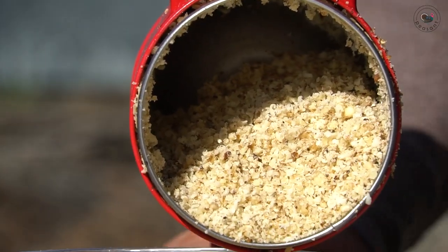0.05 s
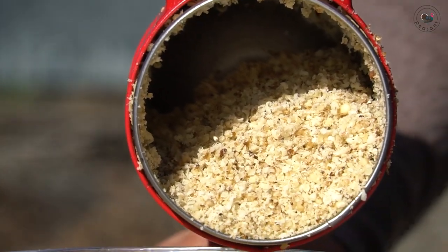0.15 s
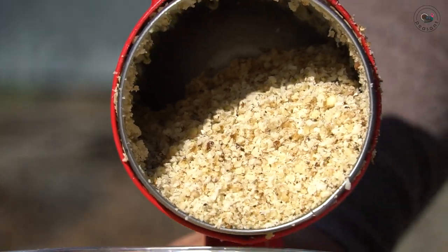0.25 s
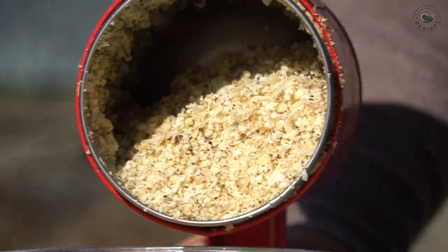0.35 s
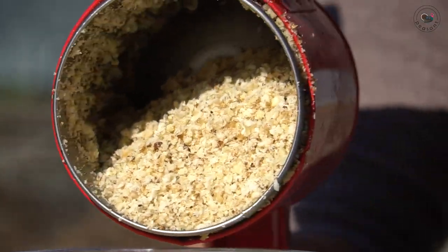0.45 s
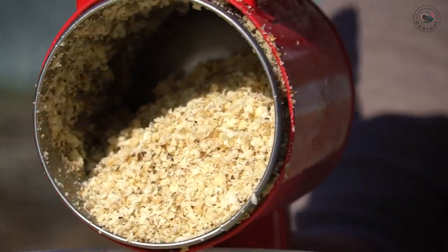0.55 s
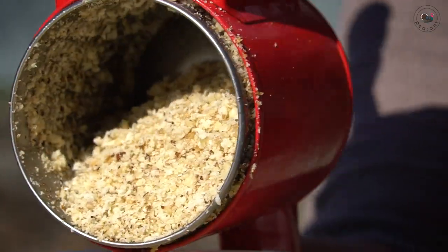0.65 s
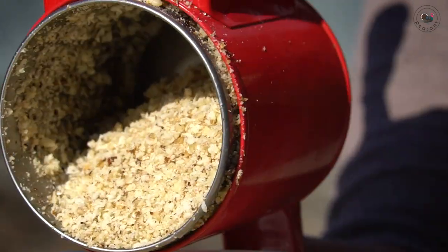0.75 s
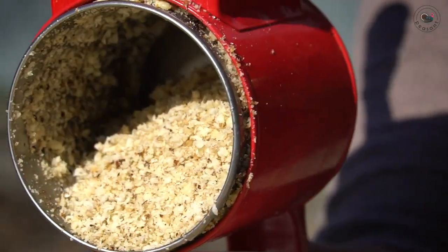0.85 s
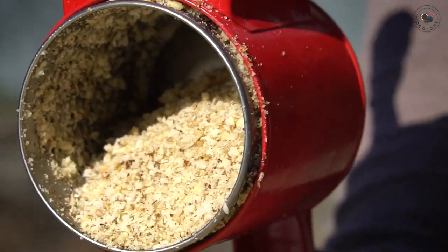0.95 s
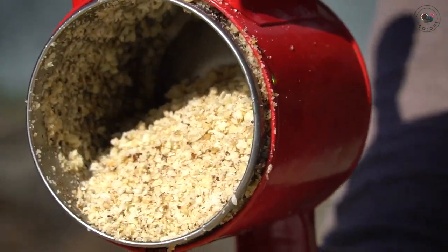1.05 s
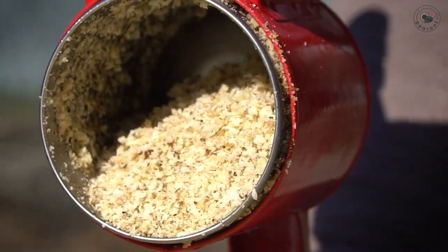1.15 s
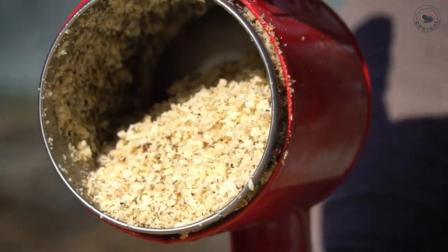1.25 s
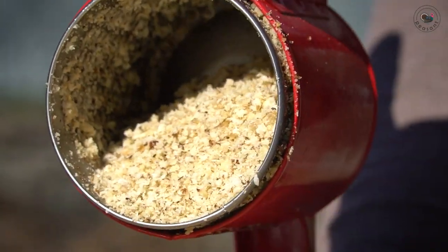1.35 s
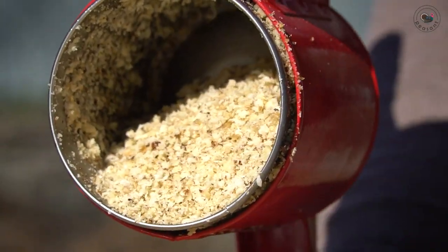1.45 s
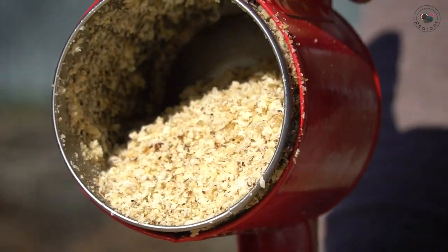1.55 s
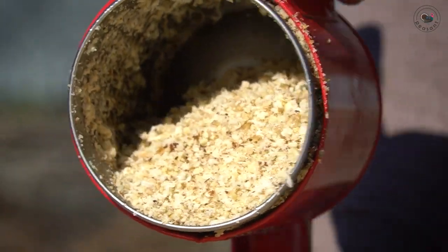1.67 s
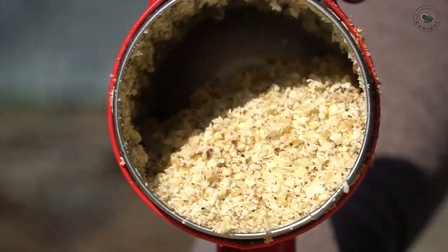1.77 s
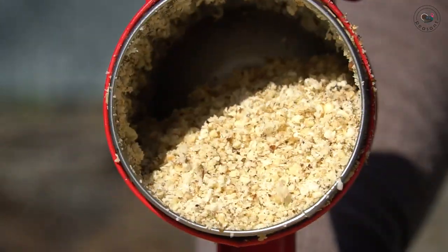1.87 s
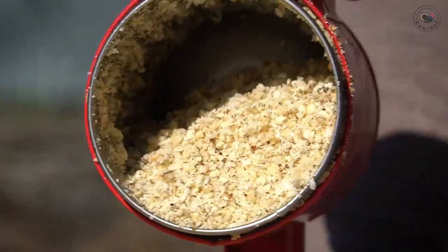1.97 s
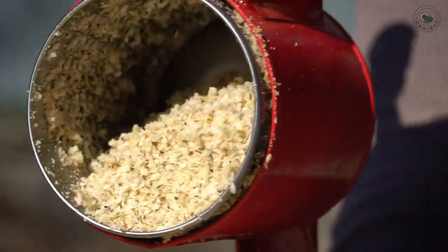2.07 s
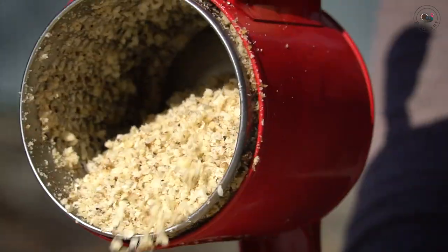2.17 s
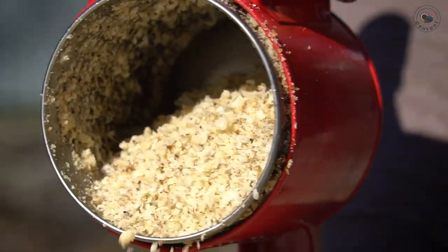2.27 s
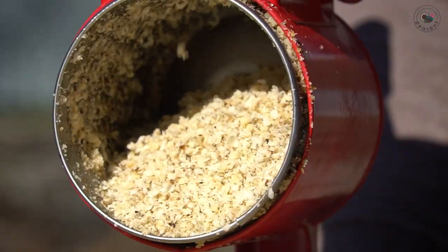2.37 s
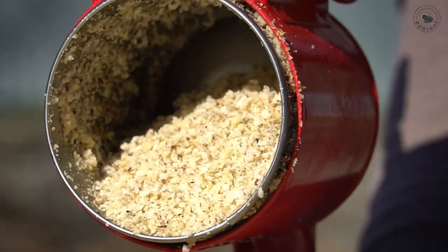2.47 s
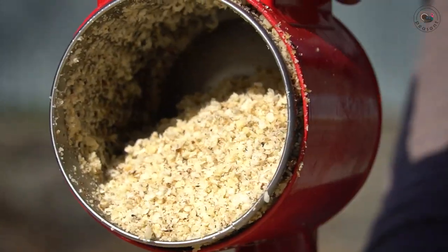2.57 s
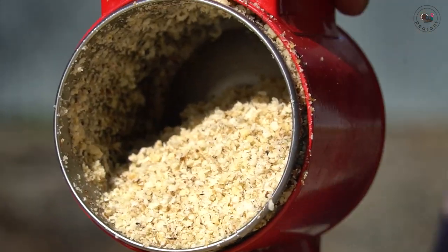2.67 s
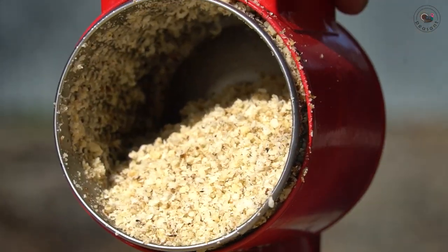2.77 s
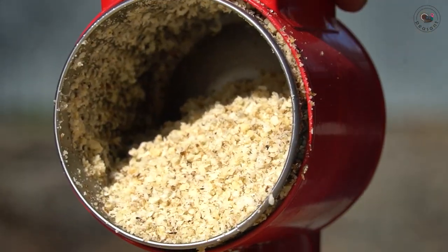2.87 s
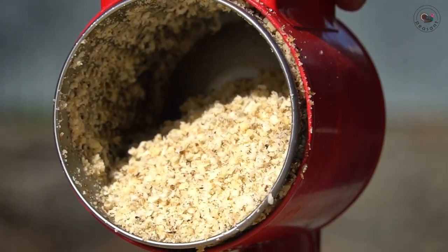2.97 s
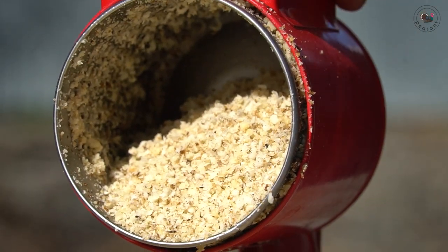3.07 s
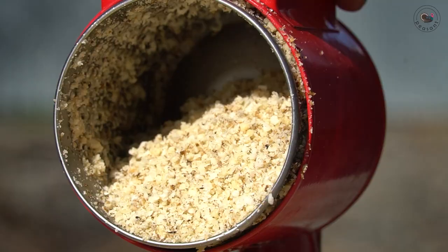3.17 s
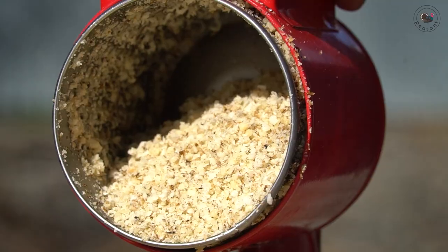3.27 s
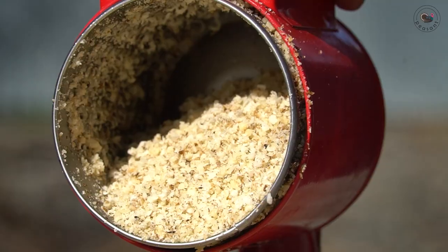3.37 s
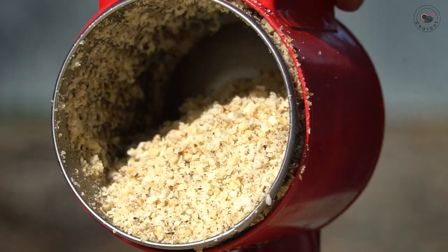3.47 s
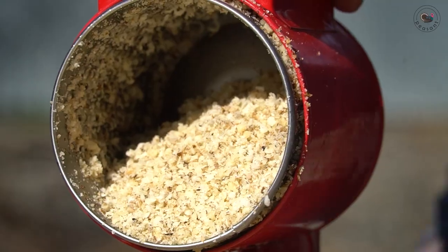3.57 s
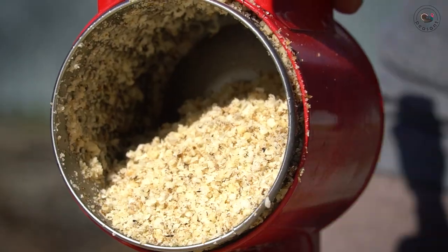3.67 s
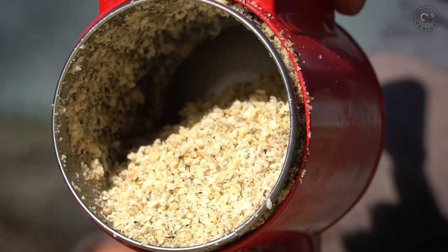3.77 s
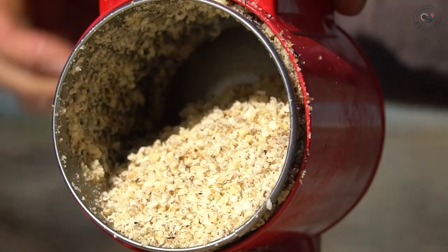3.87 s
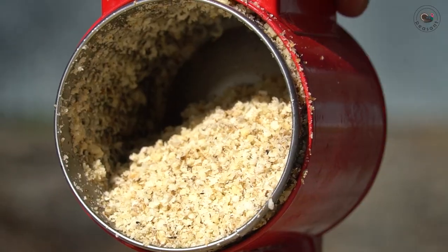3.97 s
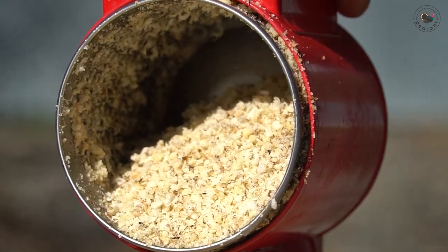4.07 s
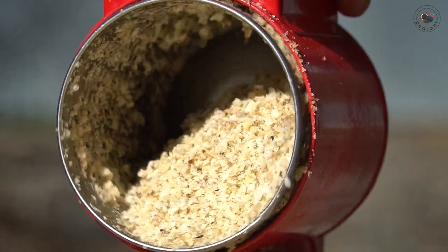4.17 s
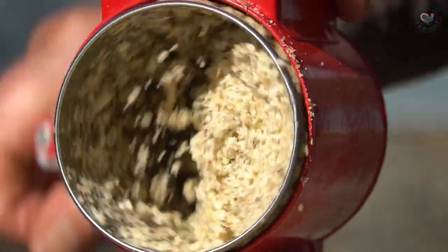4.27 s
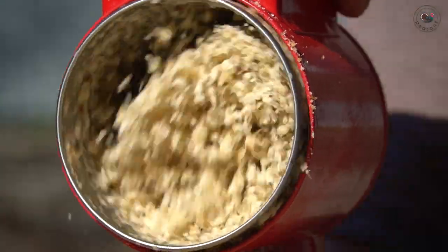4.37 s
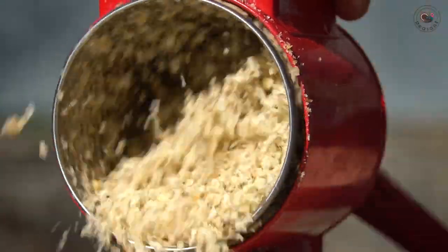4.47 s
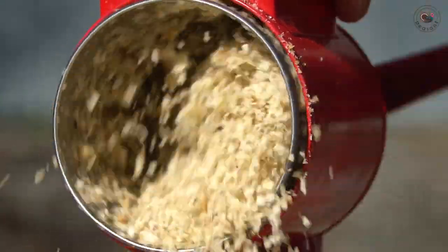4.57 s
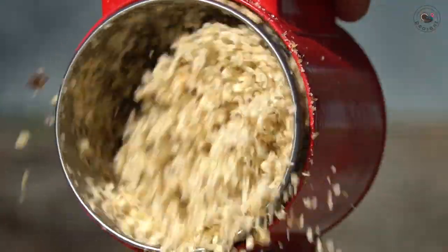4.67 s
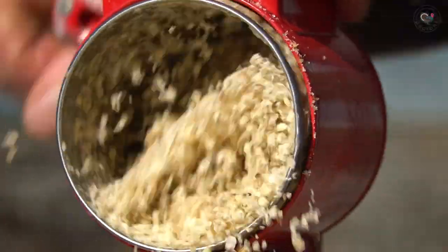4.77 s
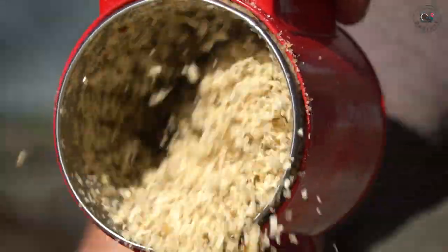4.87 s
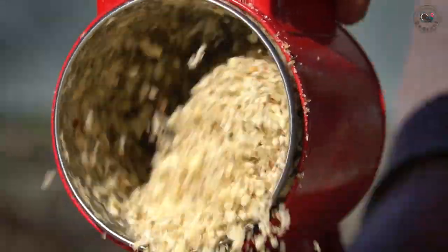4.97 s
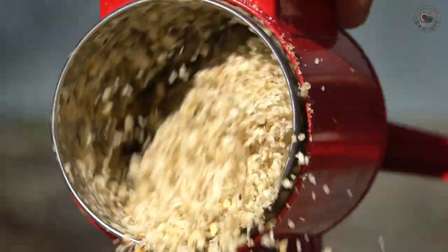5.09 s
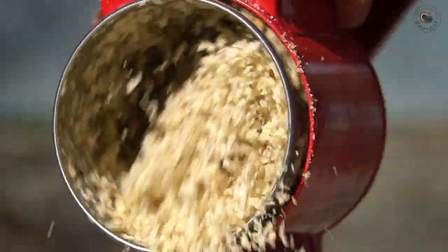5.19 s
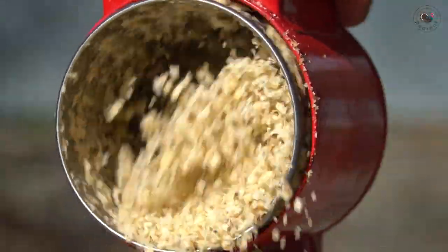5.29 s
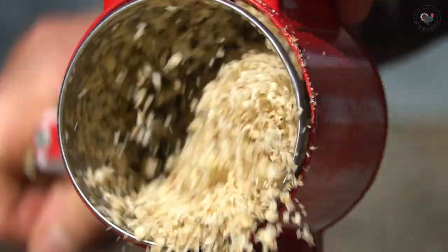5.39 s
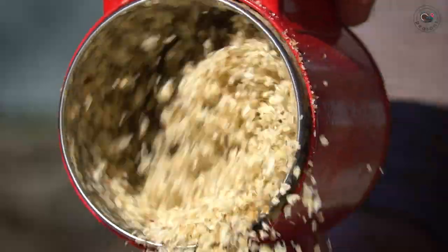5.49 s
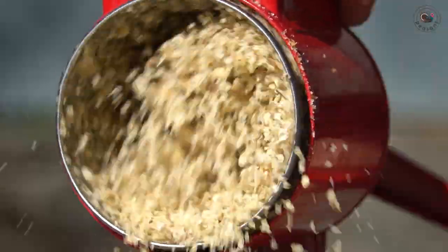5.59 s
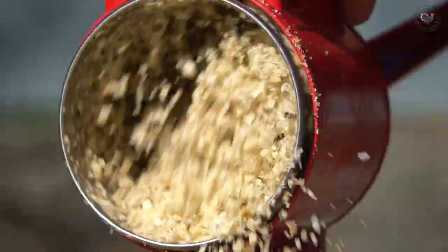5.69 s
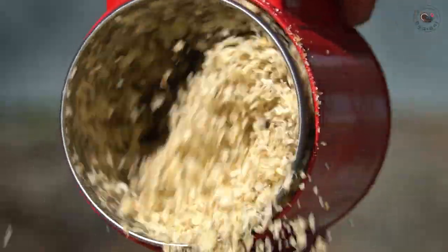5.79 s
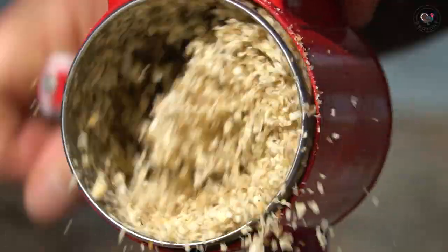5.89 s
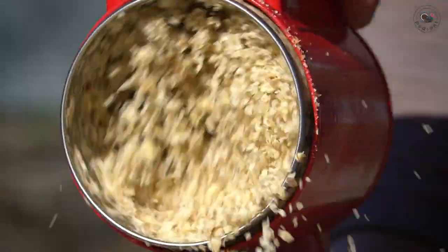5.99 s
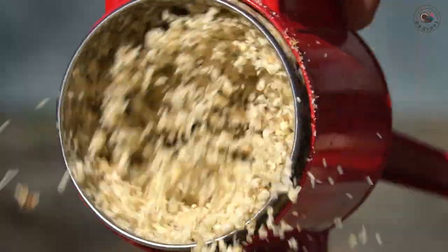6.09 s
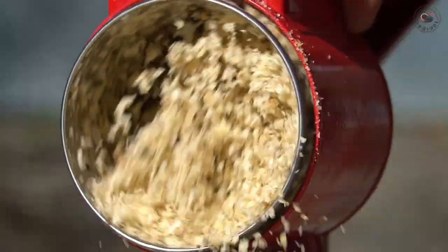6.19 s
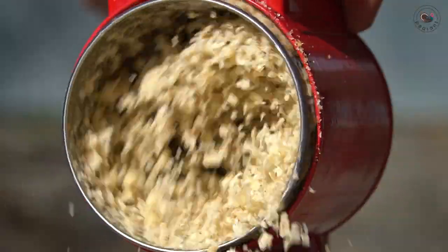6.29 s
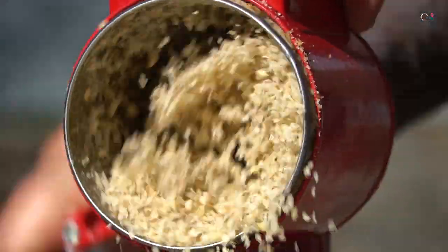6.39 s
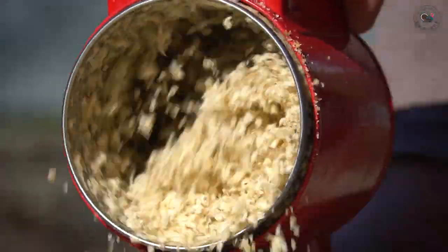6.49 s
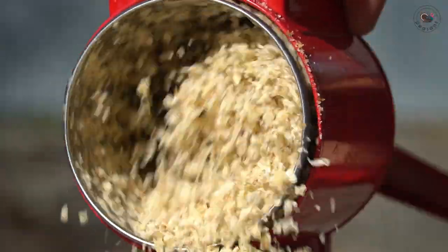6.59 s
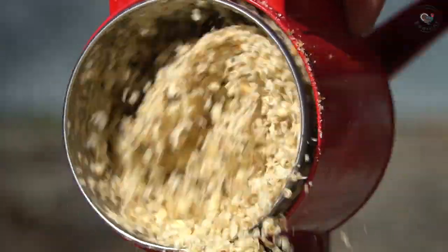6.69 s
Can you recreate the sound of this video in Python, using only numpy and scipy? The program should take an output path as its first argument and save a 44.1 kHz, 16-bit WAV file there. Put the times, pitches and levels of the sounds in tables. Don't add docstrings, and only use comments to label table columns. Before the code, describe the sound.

Sparse hollow plastic clacks and faint finger rubs over open-air hush, then a hand-cranked grater rasps and cracks nuts continuously to the end.

```python
import sys
import numpy as np
from scipy import signal
from scipy.io import wavfile
from scipy.ndimage import uniform_filter1d

SR = 44100
rng = np.random.default_rng(int(sys.argv[2]) if len(sys.argv) > 2 else 0)


def invert_db(x):
    u = np.asarray(x, float) / 20
    return 10 ** u


def master_out(mix):
    frames = np.transpose(np.atleast_2d(mix))
    ceiling = np.clip(frames, -1, 1)
    pcm = np.round(ceiling * 32767).astype(np.int16)
    wavfile.write(sys.argv[1], SR, pcm)


N = 297234
T = np.arange(N) / SR

# frequency in Hz, level in dB per Hz.
AIR_SPECTRUM = [(25, 8), (80, 8.5), (217, -7), (317, 2.5), (503, -14), (796, -5), (2280, -17), (6920, -25)]
AIR_DB = -51.5

# frequency in Hz, width in Hz, level in dB, left minus right in dB.
TABLE_MODES = [(66, 12, 0, 1.4), (133, 18, -3, 1.7), (100, 50, -11, 1.5), (200, 30, -13, 1.8)]
# centre in seconds, length in seconds, boom in dB.
HEAVES = [(0.015, 0.13, -46), (0.27, 0.052, -33), (0.57, 0.25, -44), (0.997, 0.26, -40),
          (1.328, 0.24, -40.5), (1.802, 0.24, -41), (2.082, 0.13, -37.5), (3.453, 0.12, -52),
          (3.638, 0.16, -46), (3.905, 0.16, -48), (4.102, 0.27, -51), (4.443, 0.31, -36),
          (4.652, 0.086, -40), (4.905, 0.28, -36.5), (5.44, 0.37, -34.5), (5.612, 0.079, -32),
          (5.848, 0.19, -34.5), (6.035, 0.084, -32), (6.285, 0.095, -32), (6.564, 0.17, -32.5)]
REST_DB, SHAKE_DB = -62, -13.5

# frequency in Hz, width in Hz, level in dB, left minus right in dB.
HOUSING_MODES = [(253, 65, -2, 1.5), (306.2, 34, 5.5, 2), (422, 168, 1, 3.5), (514, 86, 2, 1.5),
                 (633, 397, -4, 0), (782.5, 206, 3.5, 4), (829.3, 137, 7, 1.5), (893, 260, -7.5, 11),
                 (1140, 170, -14.5, -16)]
CRUMB_MODES = [(3500, 1570, 3.5, -1.3), (4050, 1700, 1, 0.22), (5450, 1500, -6, 0.32),
               (1740, 1300, -3.5, -0.12)]
SKIN_MODES = [(4960, 6600, 1, .1), (9000, 8800, 1.5, .1), (13500, 6800, 3, .1)]
DRUM_MODES = [(1586, 580, 5, 3.5), (2020, 410, 8.5, -4), (2940, 860, 7, -1.5), (3850, 1330, 0.5, -4.5),
              (4550, 200, -3.5, 15.5)]
TEETH_MODES = [(5570, 2120, 3.5, 1), (6900, 1060, -3, 1), (8600, 2900, 2, -1), (11440, 1550, -7, -1.3),
               (14200, 5100, -0.5, -1.6)]

# time in seconds, creak in dB.
GRIP = [(0.0, -64), (0.44, -48.5), (0.75, -71.5), (1.25, -52), (1.7, -63), (1.93, -54.5), (2.7, -74),
        (2.91, -58), (3.38, -64), (3.67, -54.5), (4.1, -59), (4.25, -48)]
# start in seconds, length in seconds, crumb rustle in dB, finger slide in dB.
RUBS = [(0.018, 0.049, -48.5, -52.5), (0.073, 0.013, -56, -56), (0.1, 0.051, -48.5, -48.5),
        (0.163, 0.051, -50, -57), (0.242, 0.042, -53, -56), (0.327, 0.051, -51, -51.5),
        (0.381, 0.02, -46, -51), (0.411, 0.046, -43, -46.5), (0.494, 0.011, -68, -49),
        (0.524, 0.038, -51, -53.5), (0.573, 0.024, -53, -60), (0.732, 0.028, -51.5, -62),
        (0.883, 0.017, -54.5, -57), (1.142, 0.023, -58, -71), (1.395, 0.025, -53, -53),
        (1.458, 0.073, -61, -55), (2.274, 0.0056, -73, -50), (2.86, 0.055, -62, -60),
        (3.085, 0.14, -65, -49.5), (3.549, 0.066, -58.5, -63), (3.629, 0.053, -60, -73)]
TRICKLE_DB, SETTLE_DB_PER_S = -58, 8.5

# frequency in Hz, decay by 60 dB in seconds, level in dB.
BODY_MODES = [(319.7, 0.09, 12), (287.3, 0.26, -2.5), (393.5, 0.043, 11), (275, .06, -31)]
SHELL_MODES = [(576, 0.15, -2), (660, 0.033, 10), (765, 0.027, 13.5), (930, 0.047, 5)]
CLACK_MODES = [(1233, 0.023, 12), (1394, 0.033, 13), (1610, 0.019, 2)]
TICK_MODES = [(3510, 0.0069, 4.5), (2970, 0.0041, -16), (4170, 0.0063, -1.5), (4760, 0.0064, -8.5),
              (5850, .008, -21), (7670, 0.0048, -9.5)]
# start in seconds, clack in dB, thud over clack in dB, tick over clack in dB.
KNOCKS = [(0.0144, -41.5, -10, -6), (0.2447, -43, 8, -11), (0.2783, -46, -3, -13),
          (0.4005, -19.5, -14.5, -6.5), (0.5193, -22.5, -14.5, -7.5), (0.9703, -46.5, 4.5, -11),
          (1.0065, -45, 4, -2), (1.0538, -44, 3, -4), (1.1964, -46, -2, -3), (1.2412, -18, -15, -7),
          (1.322, -31.5, 2, -9), (1.7434, -18, 0, -40), (1.798, -42, 7.5, -11), (1.8672, -36.5, -7.5, -22),
          (1.8779, -19.5, -10.5, -6.5), (2.0272, -21.5, -13.5, -12), (2.101, -35.5, 6, -1.5),
          (2.365, -48.5, 12, -1), (2.4384, -44, -3.5, -12), (2.8662, -44, -5.5, -4), (2.9531, -44, 5, -15),
          (3.5642, -40.5, -2.5, -21), (3.7854, -44, 7, -11), (3.8624, -19, 0.5, -13.5),
          (3.9245, -21.5, -16.5, -6), (4.071, -44.5, 13, -13), (4.1298, -36, 7.5, 1.5), (4.166, -47, 3, 3),
          (4.211, -54, 8, -5)]
# start in seconds, thud in dB, shell over thud in dB.
BUMPS = [(0.378, -34, -10), (0.894, -39, -2), (0.924, -40, 2), (1.176, -37, -13), (1.338, -27.5, -14),
         (1.531, -48, 1), (1.671, -34.5, -24), (1.985, -40, -9), (2.511, -40, 0), (2.63, -47, 10),
         (2.733, -50, -9), (2.846, -40, -3), (3.317, -53, -4), (4.061, -28.5, -21), (4.112, -40, -8)]
SHELL_DB, SHELL_SHARE = 3, 0.17
THUD_LAG_S, LAG_S_PER_DB = 0.00236, 0.03
SEAT_S, SEAT_DB = 0.008, 13.5

# time in seconds, effort in dB, share of steel contact in dB.
CRANK = [(4.212, -58, -2), (4.24, -35.5, -9), (4.3, -26.5, -8), (4.48, -24.5, -8.5), (4.57, -27, -7.5),
         (4.67, -23, -9.5), (4.88, -19, -12.5), (4.96, -26, -11.5), (5.1, -27, -8), (5.33, -29, -8),
         (5.44, -25, -9.5), (5.61, -25, -7.5), (5.73, -27, -8.5), (5.94, -27.5, -5), (6.0, -23, -6),
         (6.14, -25, -6.5), (6.26, -24, -12), (6.74, -24, -8)]
# start in seconds, loss in dB, time to bite again in seconds.
SLIPS = [
    (4.699, 9, 0.2),
    (4.755, 5, 0.037),
    (5.104, 16, 0.048),
    (5.375, 6, 0.036),
    (5.735, 1.5, 0.014),
    (6.28, 5.5, 0.02),
    (6.284, 7, 0.14),
    (6.488, 4.5, 0.086),
]
LET_GO_S = 0.0049
# start in seconds, thud in dB, shell in dB.
LURCHES = [(4.353, -33, -10), (4.524, -40, -9), (4.617, -12, -22), (4.7407, -40, -10.5),
           (4.907, -34, -13.5), (5.41, -13, -22), (5.6339, -41, -12), (5.702, -32, -19), (6.155, -35, -25),
           (6.205, -14, -30), (6.279, -12.5, -38), (6.384, -19, -24), (6.468, -14, -23), (6.581, -17, -34)]
# start in seconds, ring in dB, ring in Hz, crack over ring in dB.
SNAPS = [(4.2328, -38, 1700, -7), (4.302, -25, 1750, -10), (4.3297, -19, 1270, -22),
         (4.477, -20, 3510, -10), (4.6377, -28, 2040, -7), (4.6635, -22, 1720, -21),
         (4.6808, -21, 3280, -11), (4.6902, -23, 2940, 0.5), (4.7327, -24, 1380, -19),
         (4.8524, -31, 1970, -7), (4.897, -25.5, 1210, -4.5), (5.005, -34, 1670, -1),
         (5.038, -35, 2090, -2), (5.0453, -23.5, 2740, -13), (5.1041, -32.5, 2640, 6),
         (5.1685, -30, 2990, -11), (5.3105, -29, 1800, -10), (5.363, -16, 1650, -22),
         (5.441, -19.5, 2220, -24), (5.5154, -33, 2020, 1.5), (5.5564, -35, 2980, -3),
         (5.6983, -31, 2020, -7), (5.7555, -22.5, 2020, -5.5), (5.8388, -28, 3020, -10),
         (6.4037, -23.5, 2940, -11), (6.4303, -32.5, 1920, -1), (6.464, -26, 2870, -21),
         (6.4852, -29, 3000, -4), (6.54, -27, 2970, -9), (6.6129, -21.5, 3800, -17)]
# start in seconds, ring in dB, ring in Hz,
# crack over ring in dB.
TAPS = [(.624, -44, 5560, -8), (.634, -45, 3900, -20), (.732, -45, 3700, -20), (1.3222, -34.5, 1640, -22),
        (1.7433, -42, 5700, -20), (1.788, -44, 3200, -20), (1.7962, -29, 1990, -30),
        (2.0997, -32, 2110, -28), (2.1035, -35, 3000, -23), (2.1055, -28.5, 1690, -40),
        (2.110, -38, 2800, -30), (2.367, -35.5, 1860, -35), (2.87, -44, 1900, -20), (3.787, -44, 1300, -30),
        (3.8622, -30, 4900, -20), (4.0715, -30.5, 2070, -42), (4.074, -36, 3000, -30),
        (4.1311, -22, 1940, -45), (5.088, -21.5, 1290, -30)]
# start in seconds, knock in dB, ring in Hz.
BITES = [(4.235, -25, 830), (4.266, -20, 750), (4.304, -16, 800), (4.353, -20.5, 845), (4.414, -20, 579),
         (4.47, -12, 544), (4.528, -16, 800), (4.561, -24, 795), (4.619, -23, 563), (4.702, -23, 740),
         (4.74, -7.5, 534), (4.766, -19, 829), (4.838, -18, 830), (4.908, -15, 710), (5.015, -15, 512),
         (5.044, -13, 756), (5.177, -22, 509), (5.214, -15, 760), (5.23, -14.5, 514), (5.313, -18, 762),
         (5.398, -20, 727), (5.429, -11, 770), (5.503, -17, 816), (5.562, -22, 764), (5.614, -13, 703),
         (5.634, -19, 820), (5.699, -14.5, 775), (5.756, -17, 715), (5.848, -24, 630), (5.955, -18, 799),
         (5.983, -13, 789), (6.121, -14, 785), (6.155, -29, 501), (6.192, -25, 738), (6.205, -15, 515),
         (6.251, -26, 840), (6.275, -25, 830), (6.384, -23, 781), (6.43, -27, 805), (6.446, -16, 830),
         (6.519, -23, 797), (6.565, -24, 770), (6.581, -9, 507), (6.681, -18.5, 710), (6.712, -19, 818)]
# start in seconds, ring in dB, ring in Hz.
CHIPS = [(4.2617, -32, 1690), (4.2684, -30, 1410), (4.2858, -26, 1780), (4.4618, -20, 3440),
         (4.4955, -20, 1670), (4.8599, -20, 1970), (4.9606, -30, 1740), (4.9781, -31, 2930),
         (5.1432, -31, 2860), (5.218, -22, 2900), (5.3198, -24, 1850), (5.4874, -21, 3080),
         (5.602, -25, 1820), (5.6715, -24, 2990), (5.8047, -21, 2070), (5.9694, -22, 2810),
         (5.9994, -20, 2850), (6.03, -23, 3700), (6.06, -26, 1950), (6.0794, -21, 2020),
         (6.0994, -19, 1810), (6.1297, -16, 1960), (6.1903, -25, 2910), (6.2364, -20, 2860),
         (6.5131, -31, 2050), (6.5594, -35, 2230), (6.6486, -26, 2800), (6.699, -29, 1920)]
BITE_T60_S, CHIP_T60_S = 0.051, 0.026
STALL_S, STALL_DB = 0.0047, 3
STEEL_LOSS = 0.71
SCRAPE_DB, SCRAPE_SHARE = -4, 0.65
BODY_EASE = 0.64


def level(x, db):
    return x * invert_db(db) / np.sqrt(np.mean(x ** 2))


def sides(pan_db):
    return np.array([[pan_db], [-pan_db]]) / 2


def curves(table):
    s, *columns = np.transpose(table)
    span = slice(int(s[0] * SR), int(s[-1] * SR + 100))
    return span, [np.interp(T[span], s, column) for column in columns]


def walk(size, rate):
    hold = int(SR / rate)
    steps = np.repeat(rng.standard_normal(size // hold + 1), hold)
    return uniform_filter1d(steps, hold)[:size]


def clicks(size, rate, scatter_db):
    hit = rng.random(size) < rate / SR
    force = rng.standard_normal(size)
    extra_db = np.minimum(scatter_db * rng.exponential(size=size), 18)
    return level(hit * force * invert_db(extra_db), 0)


def ring(size, rate, scatter_db, modes, apart, flicker_db, flicker_rate):
    mid = clicks(size, rate, scatter_db)
    side = apart * clicks(size, rate, scatter_db)
    both = np.array([mid + side, mid - side])
    out = 0
    for k, (hz, width_hz, db, pan_db) in enumerate(modes):
        peak = np.concatenate(signal.iirpeak(hz, hz / width_hz, SR))
        band = (-1) ** k * signal.sosfilt([peak, peak], both)
        out = out + band * invert_db(db + flicker_db * walk(size, flicker_rate) + sides(pan_db))
    return level(out, 0)


def strike(modes, push_s, rattle_s, rattle):
    t = T[:4096]
    body = 0
    for hz, t60, db in modes:
        detune, luck = rng.standard_normal(2)
        tone = np.sin(2 * np.pi * hz * (1 + .012 * detune) * t)
        body = body + invert_db(db + 1.5 * luck) * tone * 1000. ** (-t / t60)
    contacts = rng.random(len(t)) < .03
    force = rattle * rng.standard_normal(len(t)) * contacts * np.exp(-t / rattle_s)
    force[0] = 1
    push = np.hanning(int(push_s * SR) + 3)
    blow = signal.fftconvolve(np.convolve(force, push), body)[:len(t)]
    return blow / np.abs(blow).max()


def add(out, x, s, db, pan_db):
    i = max(int(s * SR), 0)
    out[:, i:i + len(x)] += x[:N - i] * invert_db(db + sides(pan_db))


def air():
    out, (hz_points, db_points) = 0, np.transpose(AIR_SPECTRUM)
    for hz in 30 * 2 ** np.arange(0, 9.1, .5):
        mid, side = signal.lfilter(*signal.iirpeak(hz, 2.5, SR), rng.standard_normal((2, N)))
        db = np.interp(np.log(hz), np.log(hz_points), db_points) + 0.24 * walk(N, 7.43)
        out = out + invert_db(db) * (mid + min(hz / 1000., .8) * side * np.array([[1], [-1]]))
    return level(out, AIR_DB + 0.5)


def cranking():
    span, (effort_db, steel_db) = curves(CRANK)
    loss_db = 0
    for s, db, back_s in SLIPS:
        since = np.clip(T[span] - s, 0, 1)
        loss_db = loss_db + db * np.minimum(since / LET_GO_S, 1) * np.exp(-(since / back_s) ** 2)
    return span, effort_db, steel_db, loss_db


def table():
    boom = np.full(N, invert_db(REST_DB))
    for s, length_s, db in HEAVES:
        boom += invert_db(db) * np.exp(-(2 * (T - s) / length_s) ** 2)
    span, effort_db, _, loss_db = cranking()
    boom[span] += invert_db(effort_db - loss_db + SHAKE_DB)
    return ring(N, 2000, 0.46, TABLE_MODES, 0.088, 0.44, 31) * invert_db(-4.5) * boom


def handling():
    span, (creak_db,) = curves(GRIP)
    out, size, t = np.zeros((2, N)), len(creak_db), T[span]
    rustle, slide = invert_db(TRICKLE_DB - SETTLE_DB_PER_S * t), 0
    for s, length_s, rustle_db, slide_db in RUBS:
        u = np.clip((t - s) / length_s, 0, 4)
        jolt = np.minimum(u * length_s / .002, 1) * np.exp(-u ** 2)
        swell = np.sin(np.pi * np.minimum(u / 1.42, 1) ** 0.47) ** 2
        rustle = rustle + invert_db(rustle_db) * jolt
        slide = slide + invert_db(slide_db) * swell
    out[:, span] = ring(size, 800, 3.0, HOUSING_MODES, .25, 3.0, 25) * invert_db(creak_db - 1.5)
    out[:, span] += ring(size, 4000, 2.2, CRUMB_MODES, .6, 3.5, 70) * rustle
    out[:, span] += ring(size, 15000, 4.1, SKIN_MODES, 1.0, 1.6, 26.7) * slide
    return out


def knocks():
    out = np.zeros((2, N))
    seated = invert_db(-SEAT_DB * np.clip((T[:4096] - SEAT_S) / .0015, 0, 1))
    for s, clack_db, thud_over_db, tick_over_db in KNOCKS:
        tick = strike(TICK_MODES, .00008, .003, .5)
        add(out, tick, s - .0004, clack_db + tick_over_db + 9.5, -2.5)
        clack = strike(CLACK_MODES, .0002, .003, .25)
        add(out, clack, s + 0.00045, clack_db + 3.0, -3.0)
        shell = strike(SHELL_MODES, .0004, .018, .13)
        add(out, shell, s + 0.00394, clack_db + SHELL_DB + SHELL_SHARE * thud_over_db, 1.5)
        thud = strike(BODY_MODES, 0.00061, 0.01, 0.53)
        if clack_db > -25:
            thud = thud * seated
        lag_s = THUD_LAG_S - LAG_S_PER_DB * min(thud_over_db, 0)
        add(out, thud, s + lag_s, clack_db + thud_over_db + 7.5, 2.5)
    for s, thud_db, shell_over_db in BUMPS:
        add(out, strike(SHELL_MODES, 0.00093, .02, 0.17), s, thud_db + shell_over_db - 1.5, 1.5)
        add(out, strike(BODY_MODES, 0.002, 0.0077, 0.53), s, thud_db + 2.5, 2.5)
    return signal.sosfilt(signal.butter(2, 190, "high", fs=SR, output="sos"), out)


def lurches():
    out = np.zeros((2, N))
    for s, thud_db, shell_db in LURCHES:
        add(out, strike(SHELL_MODES, 0.001, 0.006, 0.44), s, shell_db - 8.5, 2.2)
        add(out, strike(BODY_MODES, 0.0013, 0.012, 0.38), s, thud_db - 8.0, 2.5)
    return out


def snaps():
    out, t = np.zeros((2, N)), T[:400]
    sharp = signal.butter(3, 5000, "high", fs=SR, output="sos")
    for s, ring_db, hz, crack_over_db in [*SNAPS, *TAPS]:
        crack = signal.sosfilt(sharp, rng.standard_normal(len(t)) * np.exp(-t / 0.0011))
        add(out, crack / np.abs(crack).max(), s, ring_db + crack_over_db + 14.5, -1.2)
        modes = [(hz, .012, 0), (.78 * hz, .008, -7), (1.3 * hz, .006, -6)]
        ping = strike(modes, .00005, .002, .4)
        add(out, ping, s, ring_db + 5.0, -2.5)
    return out


def bites():
    out = np.zeros((2, N))
    for s, db, hz in BITES:
        modes = [(hz, BITE_T60_S, 0), (0.69 * hz, BITE_T60_S, -11), (1.14 * hz, .02, -6)]
        add(out, strike(modes, 0.00037, 0.0038, 0.37), s, db - 2.5, 2.3)
    for s, db, hz in CHIPS:
        modes = [(hz, CHIP_T60_S, 0), (1.45 * hz, .006, -9)]
        add(out, strike(modes, .00005, 0.0038, 0.39), s, db - 5.5, -2.4)
    return out


def stalls():
    return sum(STALL_DB * np.exp(-((T - s + STALL_S) / STALL_S) ** 2) for s, _, _ in BITES)


def grating():
    span, effort_db, steel_db, loss_db = cranking()
    bite_db = effort_db - loss_db
    rasp_db = effort_db + steel_db - STEEL_LOSS * loss_db
    scrape_db = effort_db + SCRAPE_DB + SCRAPE_SHARE * steel_db - STEEL_LOSS * loss_db
    out, size, stall_db = np.zeros((2, N)), len(bite_db), stalls()[span]
    catching = invert_db(1.08 * walk(size, 39.4) - 0.18 * stall_db)
    housing = ring(size, 2500, 0.93, HOUSING_MODES, 0.051, 2.15, 18) * invert_db(bite_db + 0.64 - 0.4 * stall_db)
    body = signal.sosfilt(signal.butter(1, 500, fs=SR, output="sos"), housing)
    housing = housing + body * (invert_db(-BODY_EASE * (steel_db + 9.0)) - 1)
    drum = ring(size, 2600, 0.85, DRUM_MODES, 0.34, 1.6, 22.24) * invert_db(rasp_db + 0.5 * walk(size, 90))
    teeth = ring(size, 9000, 1.6, TEETH_MODES, 0.49, 1.0, 25.36)
    teeth = teeth * invert_db(scrape_db - 2.47 + 1.13 * walk(size, 100))
    out[:, span] = catching * (housing + drum + teeth)
    return out


def scene():
    return air() + table() + handling() + knocks() + lurches() + snaps() + bites() + grating()


def top_cut(x):
    return signal.sosfilt(signal.butter(12, 16100, fs=SR, output="sos"), x)


def record(dry):
    x = signal.sosfilt(signal.butter(2, 42, "high", fs=SR, output="sos"), dry)
    x = np.tanh(2.086 * x) / 2.357
    x = signal.sosfilt(signal.ellip(14, .2, 90, 15800, fs=SR, output="sos"), x)
    return top_cut(x)


dry = scene()
out = record(dry)
master_out(out)
```